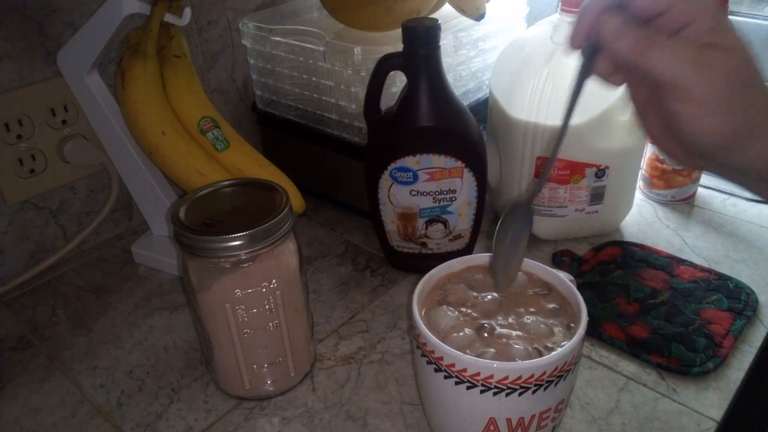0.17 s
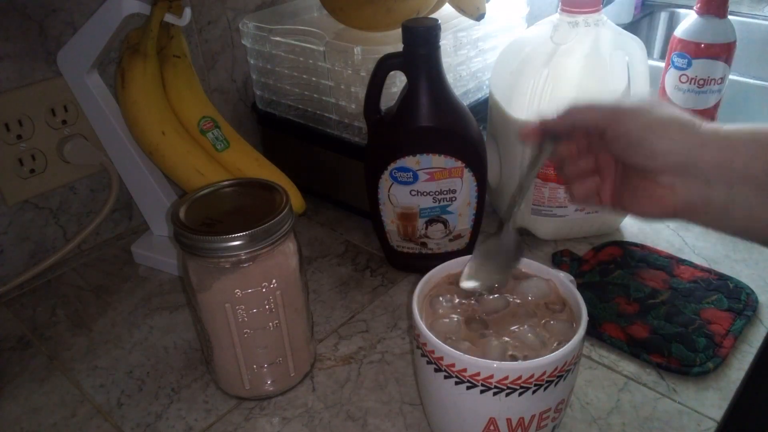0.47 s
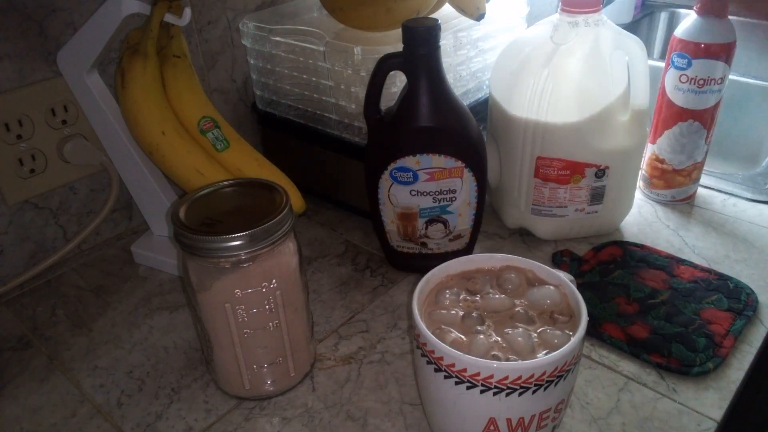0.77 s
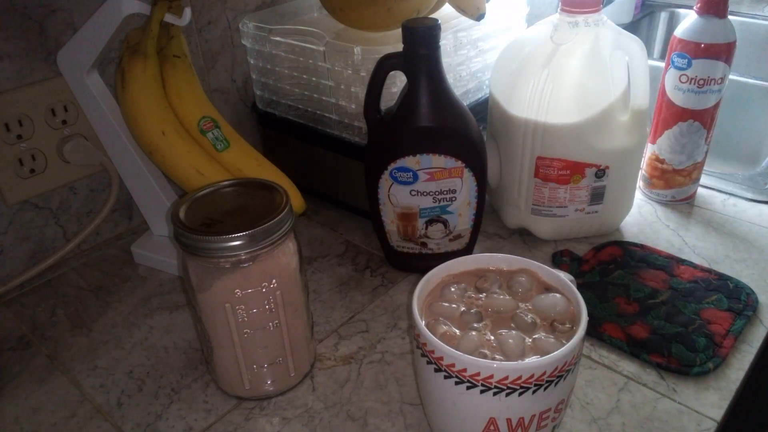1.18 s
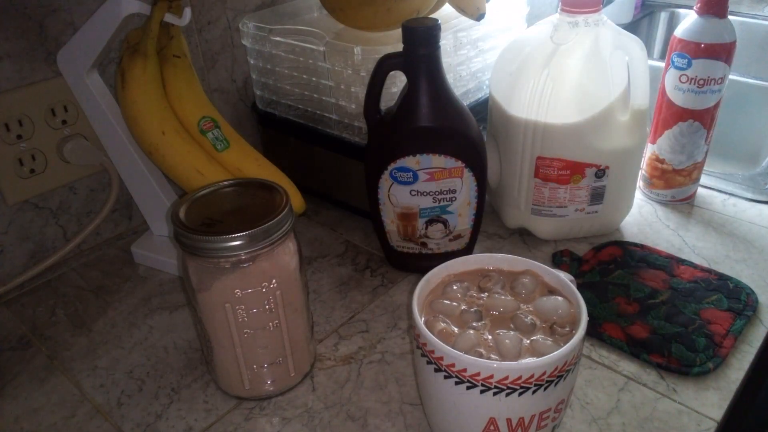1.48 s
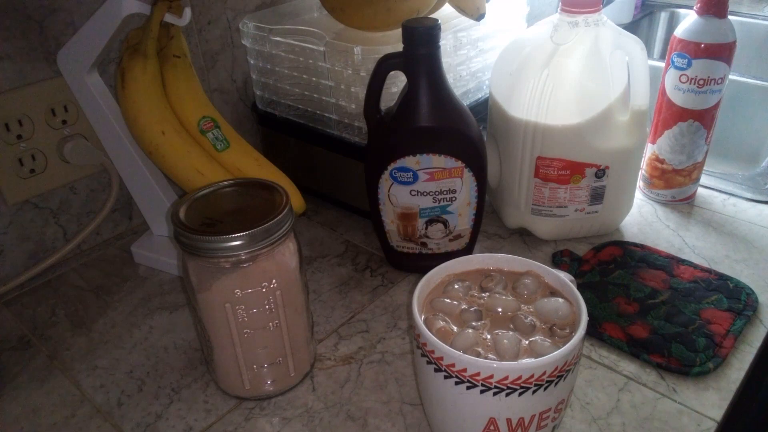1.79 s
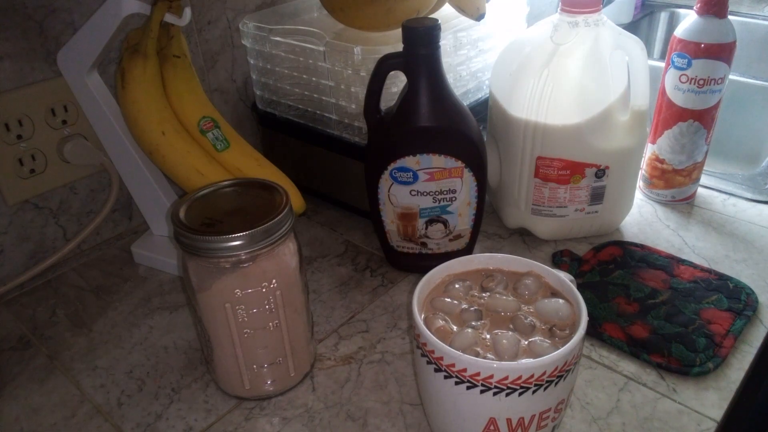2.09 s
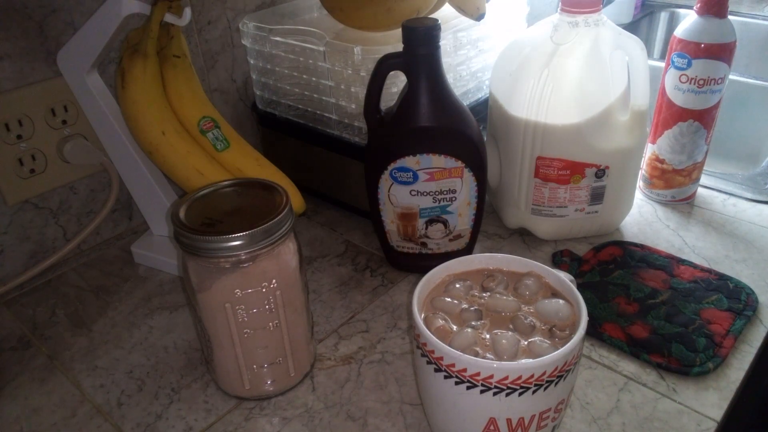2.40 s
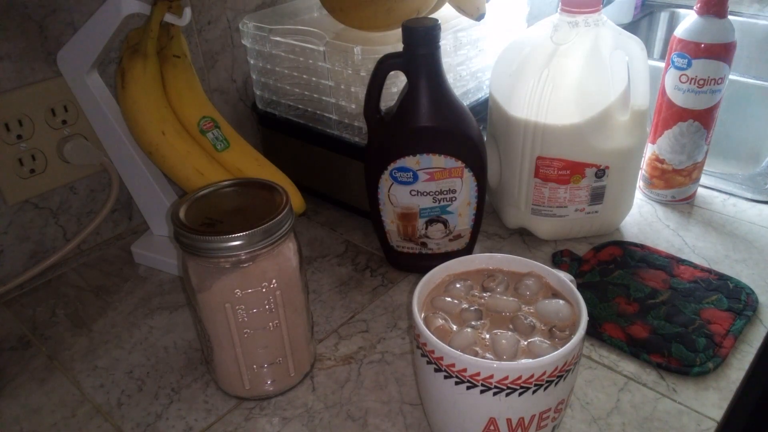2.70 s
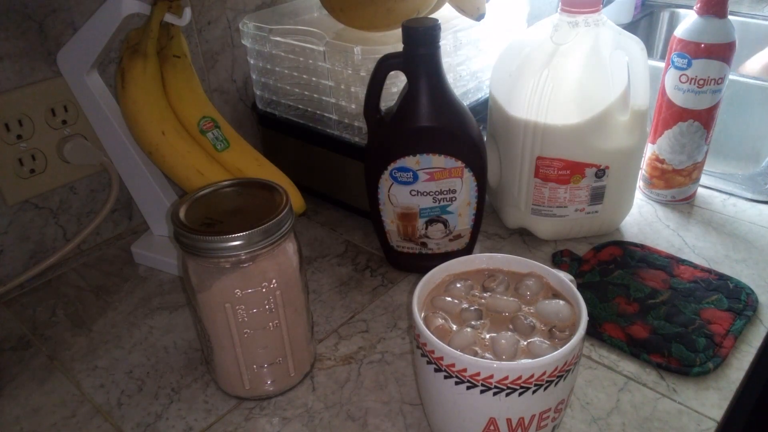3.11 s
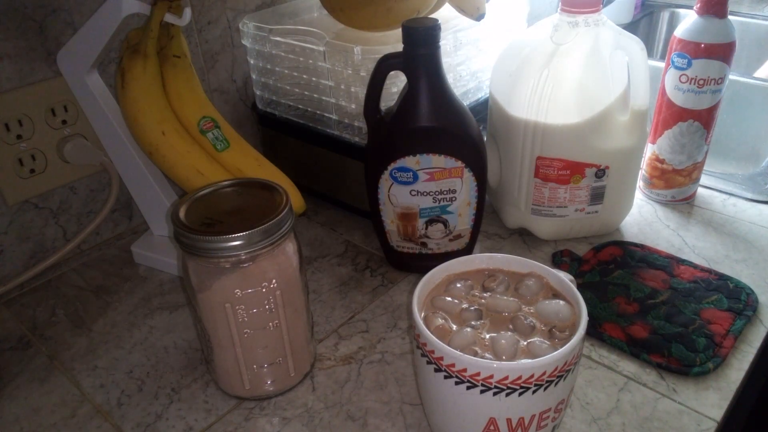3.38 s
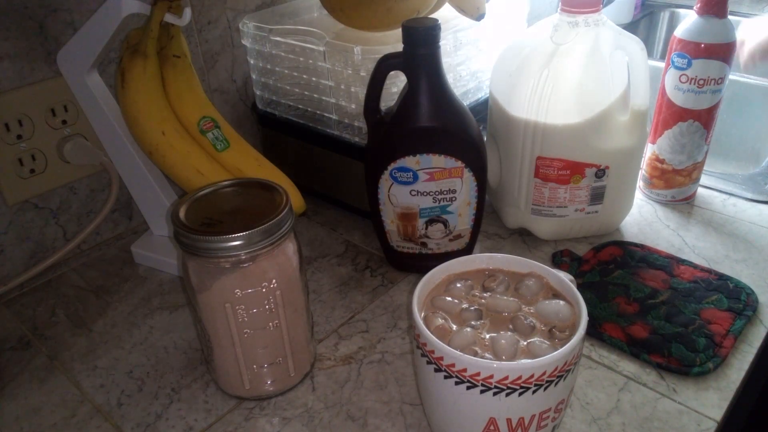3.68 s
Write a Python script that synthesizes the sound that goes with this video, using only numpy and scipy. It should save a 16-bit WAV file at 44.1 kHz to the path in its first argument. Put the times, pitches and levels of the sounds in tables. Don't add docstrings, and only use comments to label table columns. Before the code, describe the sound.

Ice cubes clink in a mug of drink as a spoon stirs, then clatters into a sink

```python
import sys
import numpy as np
from scipy import signal
from scipy.fft import rfft, irfft
from scipy.io import wavfile
from scipy.ndimage import uniform_filter1d

SR = 44100
rng = np.random.default_rng(int(sys.argv[2]) if len(sys.argv) > 2 else 0)


def gain_from_db(level_db):
    decades = np.asarray(level_db, float) / 20
    return 10 ** decades


def persist_wave(psi):
    counts = np.round(np.clip(psi, -1, 1) * 32767).astype(np.int16)
    wavfile.write(sys.argv[1], SR, np.atleast_2d(counts).T)


N = 169785
TIME = np.arange(N) / SR

# (time [s], peak level [dB], pitch [Hz])
ICE_KNOCKS = [(0.0014, -31.5, 1990), (0.0203, -30.5, 2880), (0.058, -26.5, 2810), (0.0642, -13, 2250),
              (0.0821, -18, 2080), (0.0992, -12, 2936), (0.105, -27, 3600), (0.1107, -25, 3070),
              (0.1448, -24, 1800), (0.1754, -37, 2650), (0.181, -33, 1790), (0.183, -23.5, 2900),
              (0.1904, -29.5, 4550), (0.209, -35, 2020), (0.232, -36, 1910), (0.261, -47.5, 3000),
              (0.283, -48.5, 4050), (0.3087, -50, 3100), (0.335, -47.5, 1460), (0.3668, -43.5, 2960),
              (0.386, -43, 2400), (0.427, -45.5, 2340), (0.496, -44, 2840), (0.549, -50.5, 2140)]
# (time [s], level [dB], modes (frequency [Hz], level [dB], T60 [s]))
SPOON_STRIKES = [
    (0.0656, -39.5, [(7300, -10, 0.03), (8100, -1.5, 0.044), (10000, -1.5, 0.13), (11800, -2.5, 0.035), (15200, -0.5, 0.019)]),
    (0.099, -39.5, [(5740, 5, 0.07), (11550, -5.5, 0.031), (15000, -2, 0.052)]),
    (2.14, -51.5, [(5330, -7, 0.056), (9600, -1.5, 0.1), (9880, -3, 0.064)]),
    (3.511, -28.5, [(10790, 3.5, 0.15), (11700, -2, 0.031)]),
]
# (frequency [Hz], level [dB], T60 [s])
MUG_MODES = [(340, -18.5, 0.027), (626, -20, 0.072), (1125, -27, 0.19), (2410, -42.5, 0.093),
             (2775, -15, 0.027)]
# (time [s], level [dB])
SLOSH_LEVEL = [
    (0, -38.5),
    (0.058, -64),
    (.07, -36),
    (.11, -43),
    (.15, -56),
    (0.231, -54.5),
    (0.26, -86),
    (.4, -77),
    (.6, -71),
]
# (time [s], peak level [dB], low ring [Hz], high ring [Hz], high ring level [dB])
TICK_EVENTS = [(0.001, -33.5, 6930, 4850, -6), (0.191, -49.5, 11000, 9100, -9),
               (0.219, -53, 6000, 8300, -7), (0.68, -62, 6630, 3000, -6), (0.81, -60, 9700, 11000, -8),
               (0.842, -41, 11800, 14500, -3), (.849, -42.5, 6500, 15600, 2),
               (0.868, -59, 12500, 14500, -1), (0.877, -50, 4400, 13000, -10),
               (1.069, -80, 11000, 12900, -2), (1.351, -65.5, 2500, 4500, -2.5),
               (1.425, -62.5, 1590, 3980, 0.5), (2.135, -63.5, 7400, 3500, 1.5),
               (.891, -32, 5520, 8950, -5), (0.898, -43, 2620, 3050, 1), (1.243, -44, 3780, 6410, 6),
               (1.28, -39.5, 9040, 9940, -4.5), (1.474, -44, 3960, 15700, 18),
               (1.478, -43.5, 5250, 15000, 18.5), (1.654, -46.5, 3000, 5900, 5),
               (1.79, -52.5, 2490, 1580, -8), (.482, -48, 4350, 4370, 1.5)]
# (time [s], peak level [dB], low ring [Hz], high ring [Hz], high ring level [dB])
SPOON_LANDINGS = [
    (3.183, -29, 4500, 12000, -2),
    (3.473, -30, 1850, 14800, 2),
    (3.511, -30, 11200, 15100, 6),
]
# (start [s], length [s], level [dB], brightest frequency [Hz], share spent rising [1])
SLIPPER_STROKES = [(0.835, 0.08, -59, 15000, 0.24), (0.842, 0.034, -61.5, 5000, 0.15),
                   (1.475, 0.07, -59, 9300, 0.069), (1.536, 0.079, -48, 5800, 0.5),
                   (1.543, 0.082, -53, 1520, 0.4), (1.647, 0.073, -49.5, 6000, 0.082),
                   (2.021, 0.11, -66.5, 6360, 0.3), (2.115, 0.093, -64.5, 9250, 0.28),
                   (2.199, 0.15, -53.5, 4900, 0.65), (2.228, 0.11, -58, 1920, 0.48),
                   (2.342, .16, -62, 5670, 0.13), (2.587, 0.18, -66.5, 5560, 0.17),
                   (2.671, 0.098, -59, 5600, 0.4), (2.846, 0.12, -55.5, 7640, 0.4)]
# (start [s], length [s], level [dB], bass level [dB], sheen level [dB])
SINK_RATTLES = [
    (3.181, 0.013, -30, -11.5, -12),
    (3.198, 0.036, -34.5, -3.5, -25),
    (3.47, 0.013, -30, -22, -3),
    (3.512, 0.0093, -34, -15, 0),
    (3.531, 0.037, -37.5, -12, -11),
    (3.554, 0.046, -30.5, -9, -7),
    (3.604, 0.024, -30, -9.5, -6),
    (3.631, 0.035, -31.5, -10, -12),
    (3.67, 0.046, -41, -6, -10),
]
# (frequency [Hz], level [dB])
BASIN_MODES = [(130, -39), (189, 0.5), (271, -3.5), (369, 1), (430, 2), (485, 4), (588, 8.5), (706, 4.5),
               (855, 5), (1850, 7.5), (2300, 2), (4650, -15), (5770, -1), (6480, 4)]
# (frequency [Hz], density [dB per Hz])
CLATTER_SPECTRUM = [(59, -63), (100, -40), (182, -5), (416, -23), (592, -1.5), (1220, -14.5), (1880, -14),
                    (8700, -15.5), (14000, -26.5)]
# (frequency [Hz], level [dB], T60 [s])
SHEEN_MODES = [(15000, 0, .008), (15550, -1, .008)]
# (time [s], peak level [dB], frequency [Hz], T60 [s])
BASIN_THUDS = [
    (3.191, -37, 590, 0.24),
    (3.205, -40, 200, 0.17),
    (3.555, -28.5, 590, .2),
    (3.56, -29, 275, .12),
    (3.565, -38, 710, .15),
    (3.607, -35, 600, 0.11),
    (3.615, -33, 810, 0.17),
    (3.64, -36, 720, .1),
    (3.658, -29.5, 188, 0.32),
]
# (time [s], level [dB])
SLIDE_LEVEL = [
    (3.27, -83),
    (3.31, -55),
    (3.335, -50),
    (3.37, -58.5),
    (3.412, -61),
    (3.449, -57),
    (3.469, -77),
]
# (frequency [Hz], width [Hz], level [dB])
STEEL_BANDS = [(1820, 36, 1), (2700, 37, -12), (3050, 68, -6), (4370, 77, -2.5), (6240, 69, -6),
               (7640, 100, -6), (8830, 250, -13), (10300, 29, -17.5), (11000, 100, -17), (12200, 230, -10),
               (14300, 41, -9.5), (15200, 47, -17)]
# (start [s], length [s], level [dB])
MAT_DRAG = (0.532, 0.37, -64.5)
# (frequency [Hz], level [dB], T60 [s])
MAT_MODES = [(1238, 9, 0.036), (2260, 4, 0.0069), (5120, 2, 0.0063), (6550, -1.5, 0.0028),
             (15000, -8, 0.0036)]
# (frequency [Hz], density [dB per Hz])
AIR_SPECTRUM = [(25, -14), (70, -6.5), (450, -13.5), (600, -14), (1500, -25.5), (6000, -35.5),
                (9000, -41.5), (16000, -43)]
# (frequency [Hz], level [dB])
FRIDGE_LINES = [(360, -69.5), (426, -67)]
# (time [s], peak level [dB])
FLOOR_THUMPS = [(0.208, -41.5), (0.392, -45.5), (0.507, -41.5), (0.57, -45.5), (0.654, -48), (0.748, -47),
                (0.848, -37), (0.917, -42.5), (1.018, -49.5), (1.119, -44.5), (1.241, -44), (1.297, -41.5),
                (1.389, -59), (1.528, -51), (1.598, -50), (1.699, -53), (1.773, -62), (1.855, -47.5),
                (2.121, -62), (2.367, -50), (2.468, -64), (2.578, -61), (2.721, -63), (2.799, -54),
                (2.88, -51), (2.959, -71), (3.103, -46.5)]
# (frequency [Hz], level [dB], T60 [s])
BOOM_MODES = [(134.8, -9, 0.41), (185.4, -4, 0.11), (244, -4, 0.1), (300, -8.5, 0.025)]
# (frequency [Hz], T60 [s])
ROOM_DECAY = [(250, 0.54), (1000, 0.37), (4000, 0.27), (12000, 0.17)]
# (frequency [Hz], width [Hz], level [dB])
MIC_BUMPS = [(6450, 900, 1), (8250, 1000, -6.5), (12500, 9000, 2), (15200, 1100, 6.5)]


def colour(x, table):
    f = np.maximum(np.arange(len(x) // 2 + 1) * SR / len(x), 1)
    hz, db = np.array(table).T
    return irfft(rfft(x) * gain_from_db(np.interp(np.log(f), np.log(hz), db)), len(x))


def unit(x):
    return x / np.sqrt(np.mean(x ** 2))


def ring(x, modes):
    out = 0
    for hz, db, t60 in modes:
        pole = np.exp((2j * np.pi * hz - np.log(1000) / max(t60, 0.002)) / SR)
        out = out + gain_from_db(db) * signal.lfilter([1], [1, -pole], x).imag
    return out


def add(out, s, x):
    i = max(int(s * SR), 0)
    out[i:i + len(x)] += x[:N - i]


def walk(rate):
    k = int(SR / rate)
    steps = np.repeat(rng.standard_normal(N // k + 1), k)
    return unit(uniform_filter1d(uniform_filter1d(steps, k), k)[:N])


def contour(points):
    s, db = np.array(points).T
    return gain_from_db(np.interp(TIME, s, db, left=-120, right=-120))


def late(s):
    return np.maximum(TIME - s, 0)


def grit(db, size=N):
    return unit(rng.standard_normal(size) * gain_from_db(db * rng.exponential(size=size)))


def crack(decay_s=0.0028):
    t = np.arange(2048) / SR
    return rng.standard_normal(len(t)) * np.exp(-t / decay_s)


def patchy(x):
    edges = 1000 * 2 ** np.arange(0, 4.1, 0.25)
    band = np.searchsorted(edges, np.arange(N // 2 + 1) * SR / N)
    spectrum = rfft(x)
    out = 0
    for k in range(len(edges) + 1):
        out = out + irfft(spectrum * (band == k), N) * gain_from_db(2.5 * walk(35))
    return unit(out)


def ice():
    out, size, t60 = np.zeros(N), 8192, 0.013
    push = uniform_filter1d(np.eye(1, size, 4)[0], size=5)
    for s, db, hz in ICE_KNOCKS:
        rough = push + gain_from_db(-14.5) * np.pad(crack(), (0, size - 2048))
        cube = ring(rough, [(hz, 0, t60), (hz * 1.33, -4, t60 / 2)])
        hit = cube + ring(push, MUG_MODES)
        add(hit, 0, gain_from_db(-14.5) * colour(crack(), [(300, 1.5), (2500, 8), (6000, 9), (9000, -24)]))
        add(out, s, gain_from_db(db - 7.5) * hit)
    for s, db, modes in SPOON_STRIKES:
        flutter_db = 3.4 * walk(120)[:size]
        add(out, s, gain_from_db(db + flutter_db) * ring(np.eye(1, size)[0], modes))
    return out


def slosh():
    out, t = np.zeros(N), np.arange(512) / SR
    count, per_s, cycles = 2000, 3000, 5
    onset = np.sin(np.pi * (t / t[-1]) ** 0.3)
    for _ in range(count):
        hz = np.clip(2600 * np.exp(0.5 * rng.standard_normal()), 300, 7000)
        bubble = np.sin(2 * np.pi * hz * t) * np.exp(-t * hz / cycles) * onset
        add(out, rng.random() * count / per_s, gain_from_db(3 * rng.exponential()) * bubble)
    return out / np.std(out[:SR // 2]) * contour(SLOSH_LEVEL)


def slide():
    sing = 0
    for hz, width, db in STEEL_BANDS:
        mode = [(hz, 0, 2.2 / (width * 8))]
        sing = sing + gain_from_db(db) * unit(ring(ring(grit(1), mode), mode))
    return patchy(sing) * contour(SLIDE_LEVEL)


def sink():
    chatter, load, sheen, thud = np.zeros((4, N))
    for s, length, db, bass_db, sheen_db in SINK_RATTLES:
        gate = np.clip((TIME - s) / 0.0015, 0, 1) * np.exp(-late(s + length) / 0.0085)
        chatter += gain_from_db(db) * gate
        load += gain_from_db(db + bass_db) * gate
        sheen += gain_from_db(db + sheen_db) * gate
    for s, db, hz, t60 in BASIN_THUDS:
        rise = np.minimum(late(s) / 0.016, 1)
        thud += gain_from_db(db - 60 * late(s) / t60) * rise * np.sin(2 * np.pi * hz * TIME)
    contact = grit(-0.5) * gain_from_db(1.6 * walk(150))
    basin = [(hz, db, 0.13 * min(1, (300 / hz) ** 0.61)) for hz, db in BASIN_MODES]
    clatter = patchy(colour(contact, CLATTER_SPECTRUM)) * chatter
    bright = sheen * unit(ring(np.diff(contact, 2, append=[0, 0]), SHEEN_MODES))
    bass = ring(contact * load, basin) / np.std(ring(contact, basin))
    return thud + clatter + bright + bass


def ticks():
    out, cycles = np.zeros(N), 8
    for s, db, low_hz, high_hz, high_db in TICK_EVENTS + SPOON_LANDINGS:
        hit = gain_from_db(-36) * np.diff(crack(), 2, append=[0, 0])
        push = crack() * np.exp(-np.arange(2048) / SR / 0.0022)
        for hz, part_db in (low_hz, 0), (high_hz, high_db):
            mode = [(hz, 0, cycles / hz)]
            steep = ring(ring(push, mode), mode)
            hit = hit + gain_from_db(part_db) * steep / np.abs(steep).max()
        add(out, s, gain_from_db(db) * hit)
    return out


def shuffle():
    out, size = np.zeros(N), 16384
    w = 2 ** 1.2
    for s, length, db, hz, rise in SLIPPER_STROKES:
        u = np.arange(size) / SR / length
        rise = np.clip(rise, 0.03, 0.95)
        ramp = np.clip(np.minimum(u / rise, (1 - u) / (1 - rise)), 0, 1)
        shape = np.sin(np.pi / 2 * ramp) ** 1.41
        uneven = np.c_[400 * np.arange(1, 41), 2.5 * rng.standard_normal(40)]
        brush = colour(grit(2, size), uneven)
        brush = colour(brush, [(hz / w ** 3, -22), (hz / w, -5), (hz, 0), (hz * 2, -12)])
        add(out, s, gain_from_db(db) * shape * unit(brush))
    return out


def drag():
    s, length, db = MAT_DRAG
    u = np.clip((TIME - s) / length, 0, 1)
    return gain_from_db(db) * np.sin(np.pi * u ** 0.29) * unit(ring(np.diff(grit(1.1), append=0), MAT_MODES))


def kitchen():
    air = gain_from_db(0.8 * walk(12)) * colour(rng.standard_normal(N), AIR_SPECTRUM)
    hum = 0
    for hz, db in FRIDGE_LINES:
        hum = hum + gain_from_db(db) * unit(ring(rng.standard_normal(N), [(hz, 0, 0.3)]))
    load = np.full(N, gain_from_db(-61))
    for s, db in FLOOR_THUMPS:
        u = late(s) / 0.017
        load += gain_from_db(db - 9) * u * np.exp(1 - u)
    x = rng.standard_normal(N)
    boom = ring(x * load, BOOM_MODES) / np.std(ring(x, BOOM_MODES))
    boom = colour(boom, [(70, -19.5), (110, 2.5), (350, 3), (700, -24)])
    return gain_from_db(-65.5) * unit(air) + hum + boom


def room(x, wet_db):
    t = np.arange(SR // 2) / SR
    tail = 0
    for hz, t60 in ROOM_DECAY:
        limits = [hz / 2, min(hz * 2, 20000)]
        sos = signal.butter(1, limits, "band", fs=SR, output="sos")
        tail = tail + signal.sosfilt(sos, rng.standard_normal(len(t))) * gain_from_db(-60 * t / t60)
    tail = tail * np.minimum(t / 0.002, 1)
    tail = tail / np.sqrt(np.sum(tail ** 2))
    return x + gain_from_db(wet_db) * signal.fftconvolve(x, tail)[:N]


def scene():
    mix = room(ice() + slosh(), -10)
    mix = mix + room(sink() + slide(), -4)
    mix = mix + room(ticks(), -5)
    mix = mix + room(shuffle(), -3)
    return (mix + drag() + kitchen())[None]


def low_pass(x):
    return signal.sosfilt(signal.butter(12, 16990, fs=SR, output="sos"), x)


def record(dry):
    f = np.arange(N // 2 + 1) * SR / N
    bumps_db = sum(db * np.exp(-((f - hz) / width) ** 2) for hz, width, db in MIC_BUMPS)
    x = irfft(rfft(dry) * gain_from_db(bumps_db), N)
    x = signal.sosfilt(signal.butter(2, 80, "high", fs=SR, output="sos"), x)
    x = signal.sosfilt(signal.ellip(10, 0.2, 45, 15780, fs=SR, output="sos"), x)
    return low_pass(x)


dry = scene()
out = record(dry)
persist_wave(out)
```